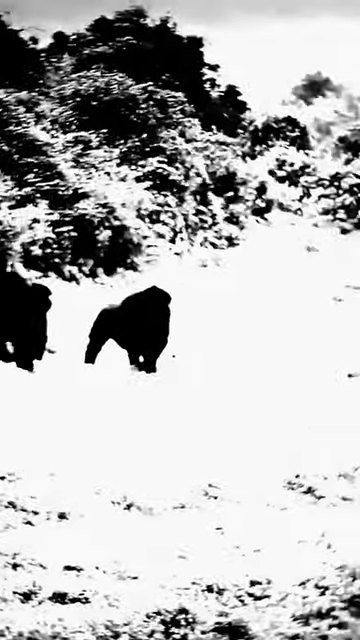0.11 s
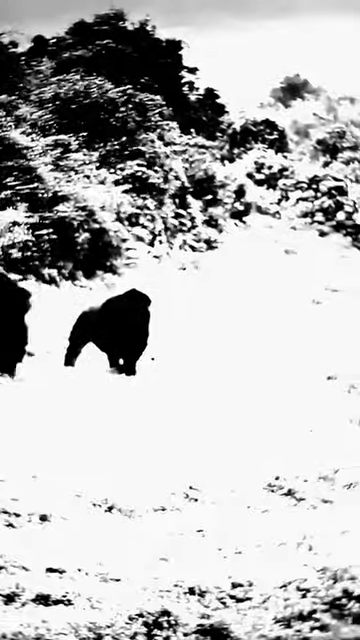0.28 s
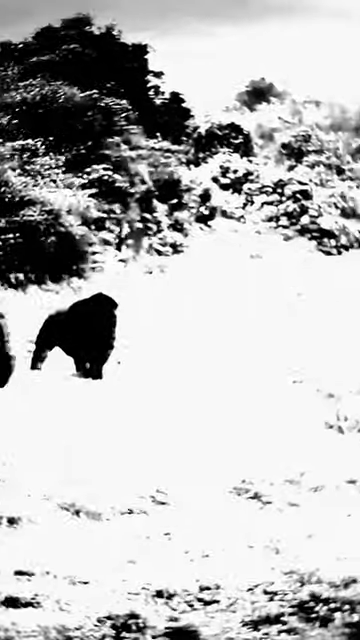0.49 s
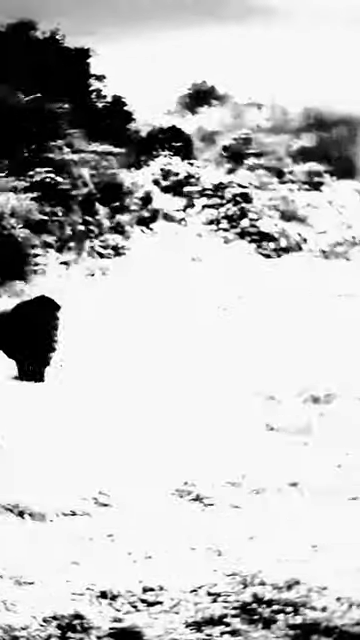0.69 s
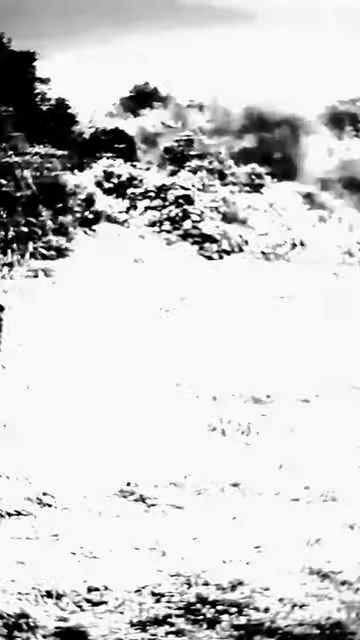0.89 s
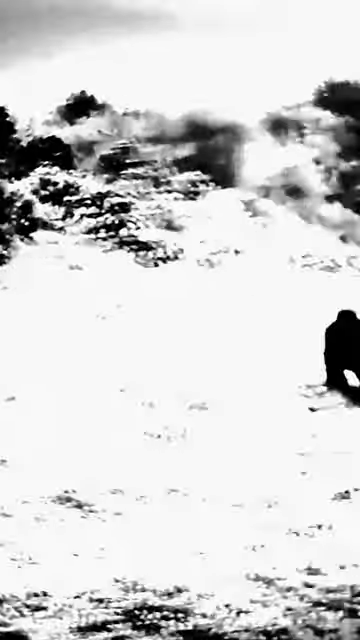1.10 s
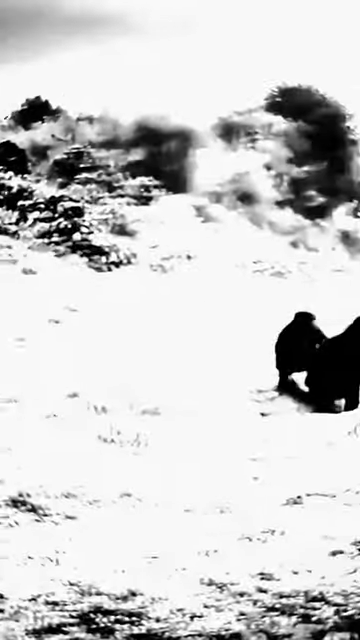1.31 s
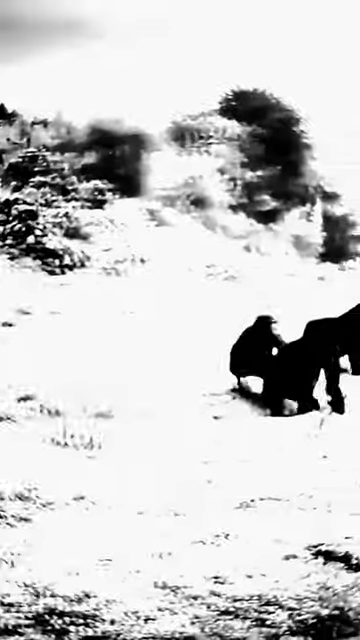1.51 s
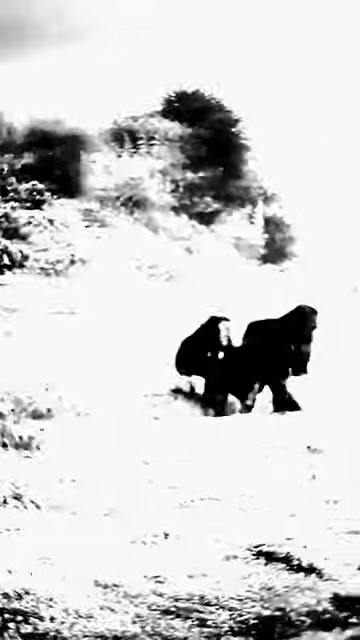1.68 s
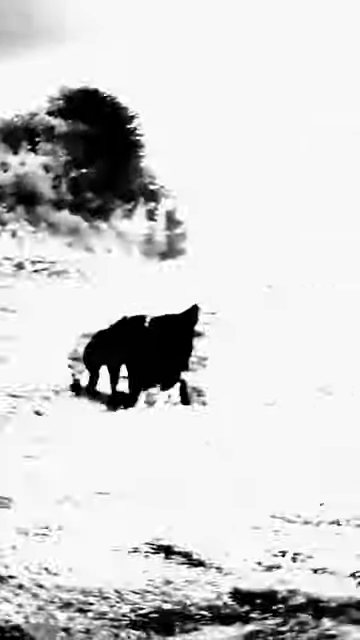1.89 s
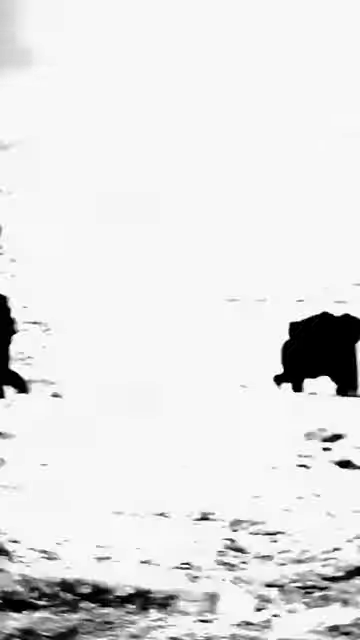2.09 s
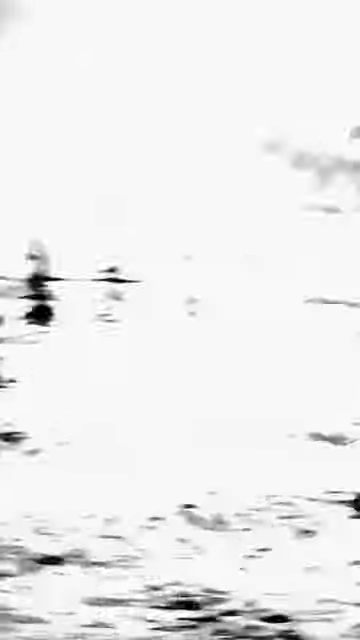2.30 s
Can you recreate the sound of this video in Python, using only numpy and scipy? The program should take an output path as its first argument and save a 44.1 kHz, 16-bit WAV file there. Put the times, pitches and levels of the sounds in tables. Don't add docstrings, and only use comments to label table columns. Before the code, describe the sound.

A gorilla gives a short rasping bark, then long hoarse screeches over low grunts in open grassland.

```python
import sys
import numpy as np
from scipy import signal
from scipy.fft import rfft, irfft
from scipy.io import wavfile
from scipy.ndimage import uniform_filter1d, minimum_filter1d

SR = 44100
rng = np.random.default_rng(int(sys.argv[2]) if len(sys.argv) > 2 else 0)


def master(y):
    cut = np.clip(np.atleast_2d(y).T, -1, 1)
    pcm = np.round(cut * 32767)
    wavfile.write(sys.argv[1], SR, pcm.astype(np.int16))


def undo_db(level):
    steps = np.asarray(level, float) / 20
    return 10 ** steps


N = 101430


def evened(x):
    return x / np.sqrt(np.mean(x ** 2) + 1e-20)


def read(points, hz):
    f, value = np.transpose(points)
    return np.interp(np.log(hz + 1), np.log(f + 1), value)


def track(rows):
    t = np.arange(N) / SR
    times, *columns = np.transpose(rows)
    curves = [np.interp(t, times, column) for column in columns]
    gate = np.clip(np.minimum(t - times[0], times[-1] + .004 - t) / .004, 0, 1)
    return curves, gate


def drift(seconds):
    size = max(int(seconds * SR), 1)
    once = uniform_filter1d(rng.standard_normal(N), size)
    return evened(uniform_filter1d(once, size))


def resonate(x, hz, width):
    turn = np.exp(2j * np.pi * np.cumsum(hz * np.ones(len(x))) / SR)
    r = np.exp(-np.pi * abs(width) / SR)
    smooth = signal.lfilter([(1 - r) ** 2], [1, -2 * r, r * r], x / turn + 1e-18)
    return 2 * (turn * smooth).real


def coloured(x, points):
    return irfft(rfft(x) * undo_db(read(points, np.fft.rfftfreq(N, 1 / SR))), N)


# time in seconds, rumble in dB, breeze change in dB.
GUSTS = [(0.0, -53.5, -6.5), (0.12, -61.5, -8.5), (0.28, -47, 6), (0.31, -53.5, -2), (1.14, -57.5, 8),
         (1.17, -67, 2.5), (1.32, -53, -5), (1.36, -67, 9), (1.41, -53.5, 4), (1.54, -63.5, 1.5),
         (1.85, -55.5, 7), (1.99, -64, 2), (2.06, -51, 2.5), (2.14, -78, -2), (2.18, -51, 10.5),
         (2.3, -81, -5)]
# frequency in Hz, level in dB.
RUMBLE = [(25, -14.5), (45, -4.5), (75, -2.5), (120, -9.5), (170, -10), (260, -41.5)]
# frequency in Hz, level in dB.
BREEZE = [(150, -33.5), (300, -14), (700, -18), (1300, -4), (1750, -12.5), (3200, -6.5), (5000, -14.5),
          (8500, -30)]


def background():
    breeze_db, drone_hz, drone_width_hz = -38.5, 60, 11
    rumble_db, change_db = track(GUSTS)[0]
    breeze = undo_db(breeze_db + change_db) * evened(coloured(rng.standard_normal(N), BREEZE))
    rumble = undo_db(rumble_db - 2.5) * evened(coloured(rng.standard_normal(N), RUMBLE))
    drone = evened(resonate(rng.standard_normal(N), drone_hz, drone_width_hz))
    return breeze + rumble + undo_db(rumble_db - 5) * drone


def folds(pitch_hz, jitter, rough, gate):
    pulse_spread_db = 3.5
    wander = jitter * drift(.002) + 0.047 * drift(0.034)
    turns = np.cumsum(pitch_hz * np.exp(wander)) / SR
    pulses = np.diff(np.floor(turns), prepend=0) * undo_db(pulse_spread_db * drift(0.002))
    puffs = evened(np.exp(-(turns % 1) / gate) * rng.standard_normal(N))
    return (1 - rough) * evened(pulses - pulses.mean()) + rough * puffs, puffs


# frequency in Hz, level in dB.
HISS = [(3600, -27), (4600, -2), (5000, 3), (5400, 15.5), (6300, 7), (6800, 6.5), (7700, 1.5), (8300, 0)]


def screech(rows, throat, chest_hz, pitch_hz, jitter, rough, flutter_db):
    wander, shimmer_db, shimmer_s, chest_width_hz = .022, 2.2, .04, 330
    (effort_db, chest_db, mouth, hiss_db), on = track(rows)
    drive, puffs = folds(pitch_hz * mouth, jitter, rough, gate=0.48)
    voice = np.zeros(N)
    for k, (hz, width, db) in enumerate(throat):
        level = undo_db(db + shimmer_db * drift(shimmer_s))
        opening = mouth if k else 1
        ring = resonate(drive, hz * opening * (1 + wander * drift(0.087)), width)
        voice += (-1) ** k * level * evened(ring)
    chest = undo_db(chest_db) * evened(resonate(drive, chest_hz, chest_width_hz))
    hiss = undo_db(hiss_db) * evened(coloured(puffs, [(2800, -61)] + HISS + [(16000, -6.5)]))
    return on * undo_db(effort_db + flutter_db * drift(0.0048)) * (evened(voice) + chest + hiss)


# time in seconds, effort in dB, chest band in dB,
# mouth opening as a factor on pitch and resonances, hiss in dB; chest and hiss are relative to the voice.
EARLIER = [
    (0, -43, -22, 0.9, -19),
    (.04, -50.5, -16, 1, -12),
    (.08, -69.5, -31.5, 1, -20),
]
LEAD_IN = [
    (.09, -54.5, -30, 1, -35),
    (.13, -41, -14.5, 0.97, -40.5),
    (.27, -34.5, -4.5, 0.99, -24),
    (.36, -45, -18, 0.8, -26),
]
FIRST = [
    (.435, -42, 7.5, 0.83, 4),
    (.475, -16.5, -10, 0.97, -18),
    (.56, -21, -16, 0.96, -21),
    (.63, -18, -18, 0.95, -26.5),
    (.74, -12.5, -24, 1.0, -16.5),
    (.9, -21.5, -23.5, 1, -22.5),
    (1.0, -15, -27.5, 0.95, -21),
    (1.12, -16.5, -26, 0.99, -20),
    (1.18, -44, -5, 0.93, -18),
]
SECOND = [
    (1.32, -46, -29, 0.9, -34),
    (1.37, -33, -11, 0.9, -24.5),
    (1.4, -22, -8, 0.87, -19),
    (1.5, -18, -13.5, 0.96, -21),
    (1.62, -20.5, -19, 0.92, -21),
    (1.76, -15.5, -31.5, 0.94, -20),
    (1.85, -24.5, -30, 1, -19.5),
    (1.868, -34.5, -27, 1.0, -11.5),
    (1.89, -43.5, -13, 0.42, -6),
]
RESUMED = [
    (1.89, -34.5, 11, 0.92, -22),
    (1.905, -22, -7.5, 0.92, -22.5),
    (1.95, -21.5, -6, 0.93, -20),
    (2.005, -19.5, -14.5, 0.96, -13),
    (2.014, -31.5, -7.5, 1.0, -11.5),
    (2.055, -38, -24, 0.98, -15),
    (2.08, -55.5, -37, 0.82, -6),
]
THIRD = [
    (2.14, -48, -29, 0.88, -1),
    (2.195, -38.5, 2, 1.0, -3.5),
    (2.245, -33.5, -19, 1.0, -18),
    (2.3, -34.5, -13.5, 0.95, -13),
]
# frequency in Hz, width in Hz, level in dB.
THROAT_LEAD = [(1150, 400, -2), (1500, 180, -3), (1950, 250, -14), (2400, 400, -2), (2850, 400, -1),
               (3250, 350, -4)]
THROAT_FIRST = [(1256, 130, -16), (1765, 280, -5.5), (2232, 346, 2), (2552, 180, -0.5), (2890, 240, -1.5),
                (3307, 363, 1.5), (4210, 1070, -7)]
THROAT_SECOND = [(1224, 100, -8), (1577, 220, -11), (1843, 120, -4), (2320, 760, -1.5), (2847, 510, 1.5),
                 (3344, 410, -1.5), (4040, 1330, -5)]
THROAT_RESUMED = [(1268, 200, -14.5), (1610, 184, -9.5), (2247, 300, -1.5), (2810, 240, -3.5),
                  (3230, 490, 0.5), (4070, 1800, -0.5)]
THROAT_THIRD = [(1150, 450, -3), (1510, 160, -2), (1950, 350, -6), (2550, 450, -10), (3200, 350, -4),
                (4100, 500, -20)]


def screeches():
    throat_earlier = [(1390, 150, -2.5), (2300, 230, -11), (3010, 300, 4)]
    full = dict(jitter=.1, rough=.55)
    return (screech(EARLIER, throat_earlier, chest_hz=915, pitch_hz=500, jitter=0.12, rough=0.9, flutter_db=2.5)
            + screech(LEAD_IN, THROAT_LEAD, chest_hz=915, pitch_hz=500, jitter=.3, rough=0.92, flutter_db=1.5)
            + screech(FIRST, THROAT_FIRST, chest_hz=1186, pitch_hz=1088, flutter_db=0, **full)
            + screech(SECOND, THROAT_SECOND, chest_hz=889, pitch_hz=1095, flutter_db=-1, **full)
            + screech(RESUMED, THROAT_RESUMED, chest_hz=1591, pitch_hz=1121, flutter_db=1.5, **full)
            + screech(THIRD, THROAT_THIRD, chest_hz=923, pitch_hz=500, jitter=.3, rough=1, flutter_db=2.5))


# centre in seconds, length in seconds, level in dB, ring in Hz.
GRUNTS = [(0.172, 0.1, -51, 392), (0.242, 0.19, -33.5, 688), (0.381, 0.1, -29, 480),
          (0.429, 0.036, -34.5, 411), (0.655, 0.083, -41.5, 376), (0.736, 0.14, -44.5, 403),
          (0.848, 0.12, -38, 470), (0.974, 0.19, -38.5, 442), (1.095, 0.22, -43, 459),
          (1.32, 0.16, -49, 317), (1.43, 0.16, -46, 584), (1.597, 0.096, -43.5, 431), (1.753, .1, -48, 352),
          (1.943, 0.045, -49.5, 301), (2.022, 0.082, -35, 637), (2.234, 0.2, -45.5, 500)]


def grunts():
    fall = .5
    t, out = np.arange(N) / SR, np.zeros(N)
    drive = folds(110, jitter=.2, rough=.75, gate=.5)[0]
    for centre, length, db, hz in GRUNTS:
        place = (t - centre) / length
        push = np.cos(np.pi * np.clip(place, -.5, .5)) ** 2
        falling_hz = hz * np.clip(1 - 2 * fall * place, .5, 2)
        chest = resonate(drive, falling_hz, 1.17 * hz) + 0.14 * resonate(drive, 338, 130)
        out += undo_db(db) * push * evened(chest)
    return out


# time in seconds, effort in dB, hiss in dB relative to the ring.
BARK = [
    (.18, -53.5, -22.5),
    (.186, -29.5, -37),
    (.199, -45.5, -19.5),
    (.2015, -27.5, -7),
    (.228, -24, -2.5),
    (.25, -23, -3),
    (.32, -31, -10),
    (.345, -44.5, -1),
    (.42, -59.5, 5.5),
]
# frequency in Hz, width in Hz, level in dB.
BARK_RINGS = [(2450, 290, -26.5), (2743, 95, -3), (3410, 1200, 0.5), (3560, 180, -28.5), (4040, 49, -15.5)]


def bark():
    hiss_colour = [(3500, -34.5), (5000, -24.5), (5500, 10.5), (6300, 2), (6730, 8.5), (7400, -1.5),
                   (8300, 1.0), (16000, -30.5)]
    (effort_db, hiss_db), on = track(BARK)
    drive, puffs = folds(87, jitter=0.067, rough=0.68, gate=1.0)
    ring = evened(sum(undo_db(db) * evened(resonate(drive, hz, width)) for hz, width, db in BARK_RINGS))
    hiss = evened(coloured(puffs, hiss_colour))
    return on * undo_db(effort_db) * (ring + undo_db(hiss_db) * hiss)


# start in seconds, level in dB, length in seconds, ring in Hz.
SNAPS = [(.2005, -25, .01, 2800), (.231, -17, .009, 2780), (.2425, -13, .005, 2850),
         (.255, -21, .005, 2800), (1.999, -17, .011, 3100), (2.016, -26, .003, 3000),
         (2.043, -31, .004, 3250), (2.055, -34, .004, 3200), (2.178, -35, .012, 1520),
         (2.198, -33, .008, 900), (2.218, -31, .005, 1500), (2.23, -33, .006, 1300),
         (2.24, -30, .006, 1480), (2.248, -33, .007, 1520)]


def snaps():
    t, out = np.arange(N) / SR, np.zeros(N)
    sway, grain = .06 * drift(.0004), 1 + .3 * drift(.001)
    turns = 2 * np.pi * np.cumsum(1 + sway) / SR
    for start, db, length, hz in SNAPS:
        attack = np.clip((t - start) / 0.00075, 0, 1)
        decay = np.exp(-(np.maximum(t - start, 0) / length) ** 2)
        out += undo_db(db) * attack * decay * np.sin(hz * turns)
    return np.sqrt(2) * grain * out


# time in seconds, pitch in Hz, level in dB.
SQUEAL = [
    (1.76, 1600, -40),
    (1.8, 1600, -31),
    (1.85, 1640, -32),
    (1.865, 1670, -29),
    (1.878, 1620, -28),
    (1.888, 1680, -29),
    (1.897, 1900, -33),
    (1.91, 1920, -50),
]


def squeal():
    (hz, level_db), on = track(SQUEAL)
    turns = 2 * np.pi * np.cumsum(hz * (1 + 0.013 * drift(0.011))) / SR
    return on * undo_db(level_db) * (np.sin(turns) + 0.78 * np.sin(2 * turns))


def near_ground(x):
    near_db, near_s = -11, .018
    taps = np.zeros(round(near_s * SR))
    taps[rng.integers(80, len(taps), size=7)] = rng.choice([-1., 1.], size=7)
    return x + undo_db(near_db) * signal.fftconvolve(x, taps / np.linalg.norm(taps))[:N]


def gain_control(x):
    limit = .92
    peak = -minimum_filter1d(-abs(x), size=88)
    return x / np.maximum(uniform_filter1d(peak, size=88) / limit, 1)


# frequency in Hz, level in dB.
ECHO_COLOUR = [(500, -16), (900, -10), (1400, -1), (2050, -0.5), (2280, 5.5), (2600, -6.5), (3200, -4.5),
               (3700, -7)]


def tree_line(x):
    echo_db, t60_s = -21, .7
    t = np.arange(SR) / SR
    tail = rng.standard_normal(SR) * undo_db(-60 * t / t60_s) * (t > .015)
    return undo_db(echo_db) * signal.fftconvolve(coloured(x, ECHO_COLOUR), tail / np.linalg.norm(tail))[:N]


# frequency in Hz, left minus right in dB.
LEFT_DB = [(600, -1), (1000, -9), (2500, -8), (2900, -12.5), (4300, -12), (4800, -2), (6900, -8.5),
           (8100, 6)]
# frequency in Hz, lag in radians.
LEFT_LAG = [(200, 0.32), (600, 0.61), (820, 1.31), (1350, 1.1), (1560, 0.1), (1850, 5.25), (2100, 4.03),
            (2700, 19.2),
            (3000, 4.58), (3500, 4.43), (4200, 48), (4450, 11), (5000, 8.7), (6250, 9.4), (6450, 11),
                 (6900, 4.3)]
# frequency in Hz, correlation from 0 to 1.
SAME = [(60, .97), (300, .995), (1000, .97), (2500, .995), (5000, .93), (9000, .88), (12000, .4)]


def stereo_spread(x):
    hz, _, z = signal.stft(x, SR, nperseg=1024, noverlap=768)
    same = np.clip(read(SAME, hz), 0, 1)[:, None]
    unrelated = z * np.exp(2j * np.pi * rng.random(z.shape)) * 2
    lag = read([(0.59, 0)] + LEFT_LAG + [(8800, 4 * np.pi)], hz)
    shade = undo_db(read(LEFT_DB + [(8800, 0.053)], hz)) * np.exp(-1j * lag)
    mixed = same * z + np.sqrt(1 - same ** 2) * unrelated
    left = signal.istft(shade[:, None] * mixed, SR, nperseg=1024, noverlap=768)[1]
    return np.array([left[:N], x])


# frequency in Hz, level in dB.
VOICE_CUT = [(300, -17.5), (750, 0)]
GRUNT_CUT = [(130, -19.5), (240, 2)]


def scene():
    calls = undo_db(7.0) * (near_ground(screeches()) + bark() + snaps() + squeal())
    animals = coloured(gain_control(calls), VOICE_CUT) + coloured(grunts(), GRUNT_CUT)
    return stereo_spread(animals + tree_line(animals) + background())


def low_pass(x):
    return signal.sosfilt(signal.butter(12, 15700, fs=SR, output="sos"), x)


# frequency in Hz, level in dB.
MIC = [(1330, 0), (1410, -8), (1480, 0), (3450, 0), (3700, -8), (8600, -8), (8900, -24), (15000, -34)]


def record(dry):
    mix = np.array([coloured(channel, MIC) for channel in dry])
    return low_pass(mix)


dry = scene()
out = record(dry)
master(out)
```